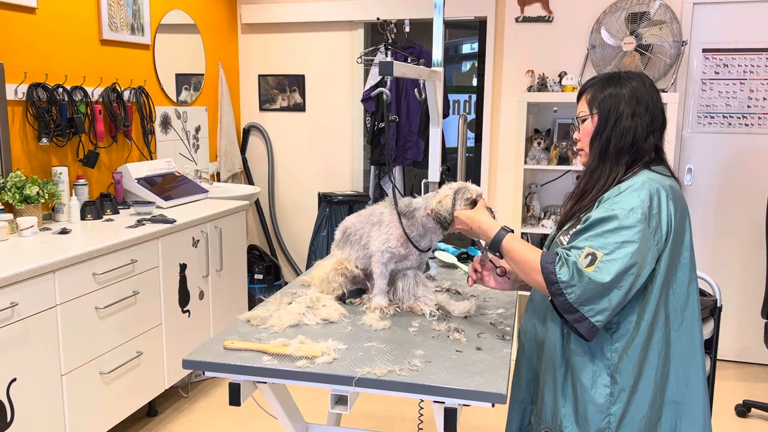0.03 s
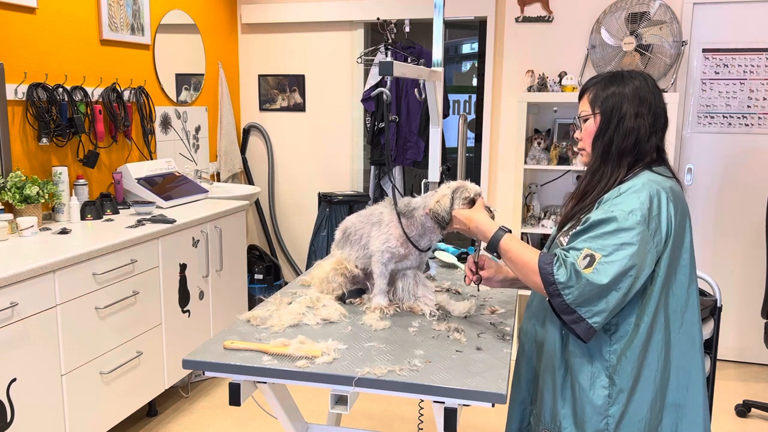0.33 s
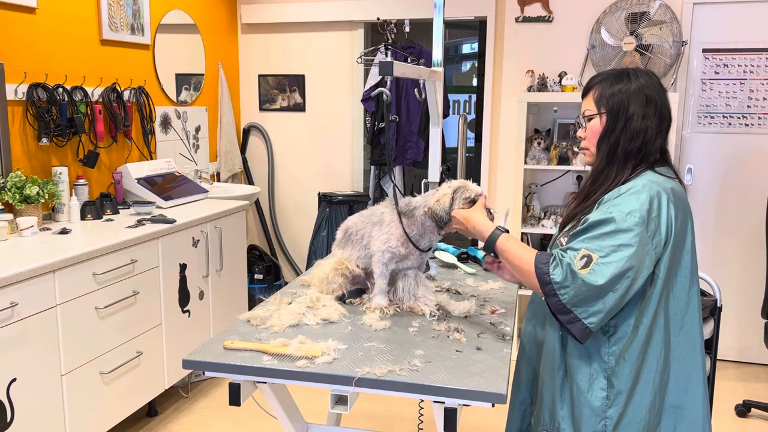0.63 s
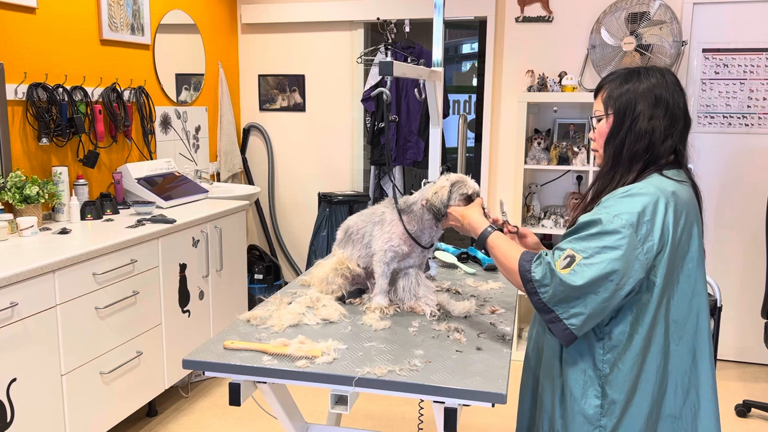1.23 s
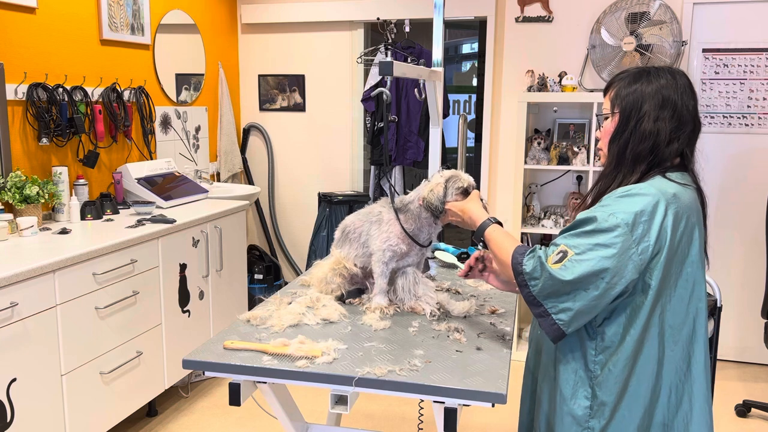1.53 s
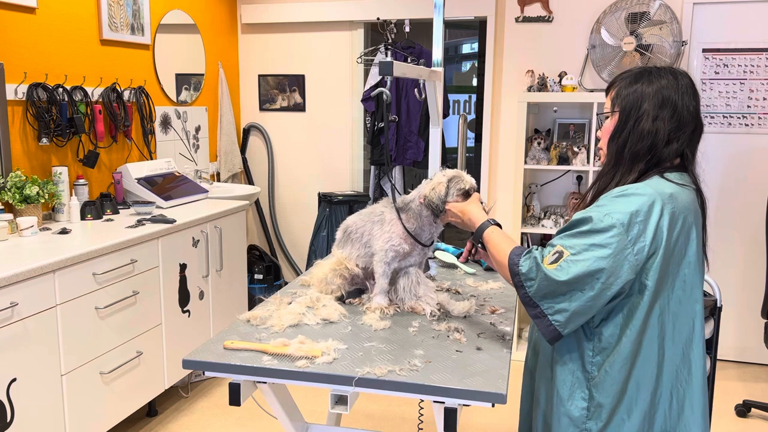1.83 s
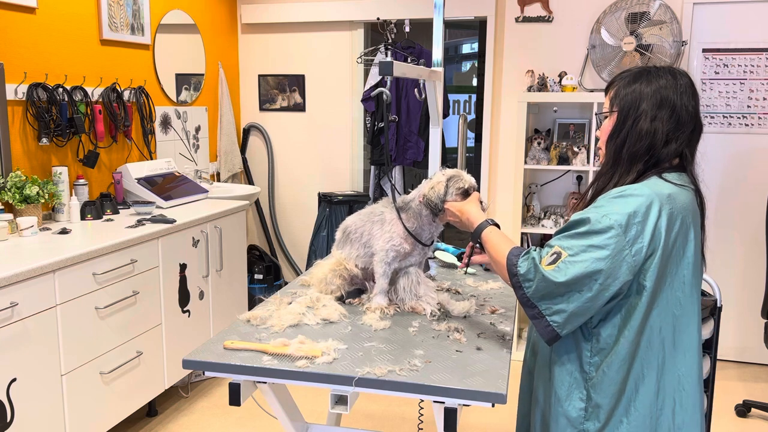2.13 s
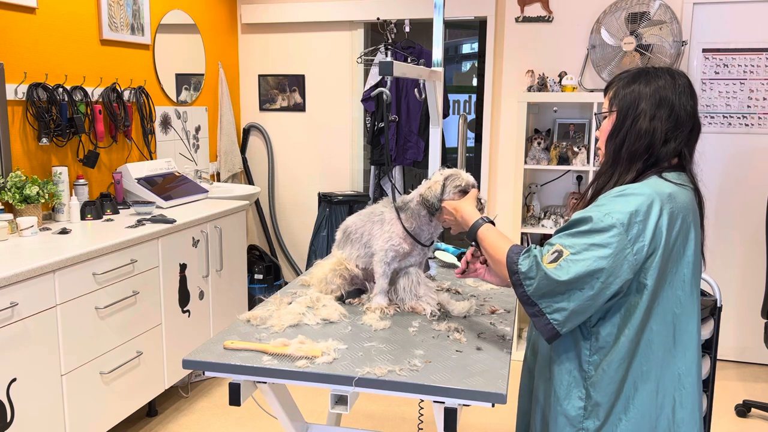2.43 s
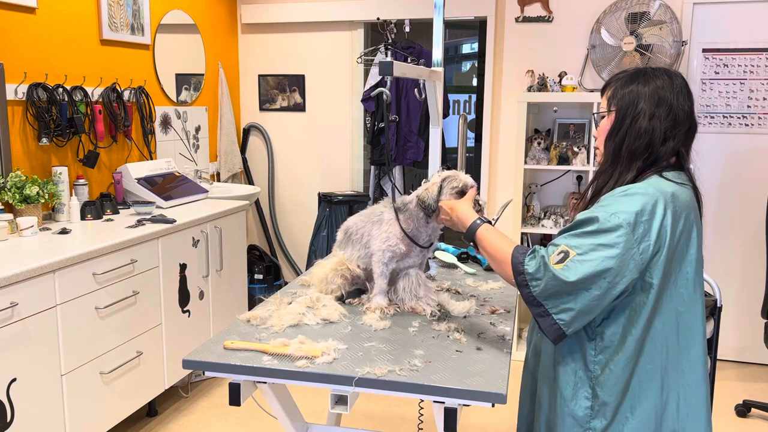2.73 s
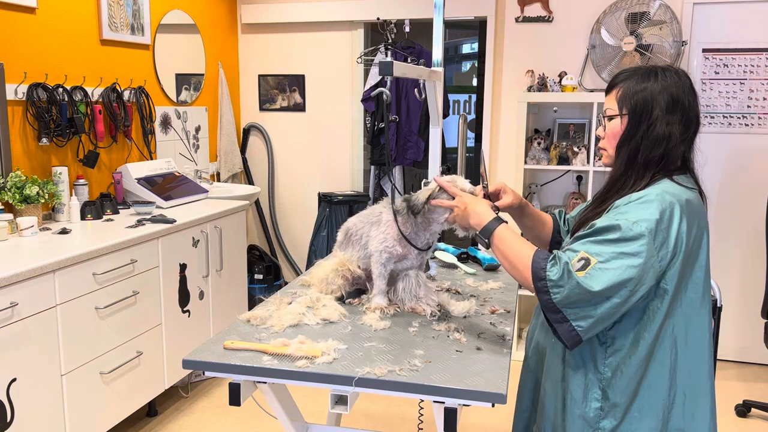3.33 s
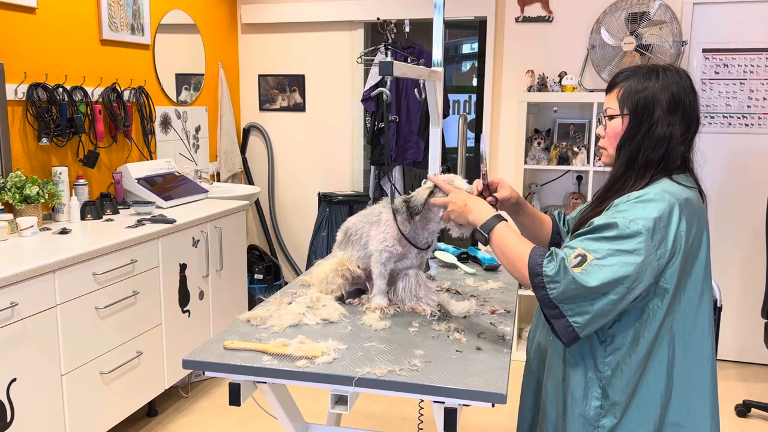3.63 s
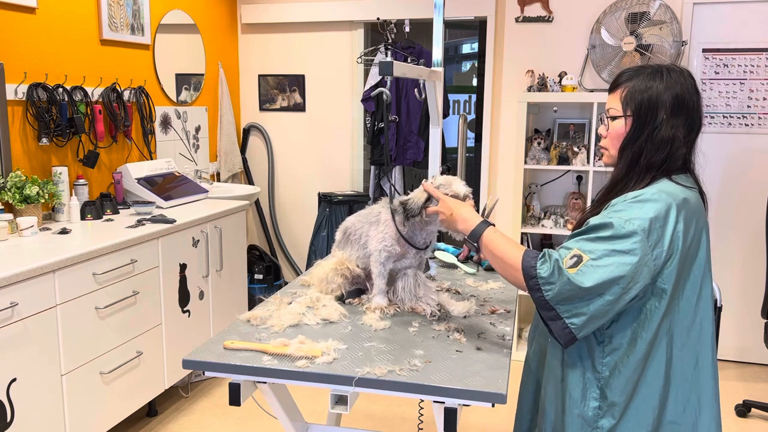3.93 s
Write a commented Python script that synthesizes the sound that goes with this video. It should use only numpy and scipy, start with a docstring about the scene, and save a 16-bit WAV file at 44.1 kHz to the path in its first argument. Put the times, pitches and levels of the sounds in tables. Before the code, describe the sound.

Grooming scissors trim a dog's fur in a small, hard-walled salon. The blades scrape and shut with one sharp, ringing clack, then give a few much softer snips and clicks. Ventilation rumbles and hisses softly throughout.

```python
"""Grooming scissors trim a dog's fur in a small, hard-walled salon.
The blades scrape along each other in short strokes. Once they shut hard, clack and ring;
three much softer clicks come later. A sleeve swishes as the arm moves.
All the while the ventilation hisses softly and keeps the room's low notes rumbling."""
import sys
import numpy as np
from scipy import signal
from scipy.fft import rfft, irfft
from scipy.io import wavfile
from scipy.ndimage import uniform_filter1d

SR = 44100
rng = np.random.default_rng(int(sys.argv[2]) if len(sys.argv) > 2 else 0)


def to_wav(s):
    """Save 16-bit WAV."""
    ch = np.atleast_2d(s).T  # columns
    pcm = np.round(np.clip(ch, -1, 1) * 32767)  # PCM
    wavfile.write(sys.argv[1], SR, pcm.astype(np.int16))


N = 176400
CRACK_S = .0009  # time a clack takes to reach its peak


def amp(db):
    """Turns decibels into a number to multiply by."""
    return 10 ** (np.asarray(db) / 20)


def unit(x):
    """Scales a signal to an average (rms) level of one."""
    return x / np.sqrt(np.mean(x ** 2) + 1e-30)


def read(points, hz):
    """Reads between the rows of a table, with pitch spaced in octaves."""
    f, value = np.transpose(points)
    return np.interp(np.log(hz + 1), np.log(f + 1), value)


def add(mix, start_s, sound):
    """Mixes a sound in at a given time."""
    part = mix[max(round(start_s * SR), 0):][:len(sound)]
    part += sound[:len(part)]


def colour(x, curve):
    """Turns each pitch up or down by a curve from Hz to dB."""
    return irfft(rfft(x) * amp(curve(np.fft.rfftfreq(x.shape[-1], 1 / SR))), x.shape[-1])


def lean(pair, balance):
    """Tips a stereo sound left or right, pitch by pitch."""
    return colour(pair, lambda f: np.outer([.5, -.5], read(balance, f)))


def bump(f, hz, width_hz):
    """A resonance: a peak of height one around a favoured pitch."""
    return 1 / (1 + (2 * (f - hz) / width_hz) ** 2)


def blade_stroke(length_s, level_db, swell_db, edge_hz, body_hz, tilt_db, sizzle_db):
    """Edge slips on edge in tiny jerks while hairs snap in clumps; edge and blade colour the noise."""
    # Tone of steel rubbing on steel: pitch_hz, level_db
    rub_tone = [(300, -11.5), (900, -8), (1900, -17.5), (2700, -7.5), (4200, -7.5), (6000, -4.5),
                (7100, -6.5), (7900, -3.5), (8700, 1), (9800, -9), (12300, -1.5), (14000, -23.5),
                (15500, -4)]
    slips_per_s, slip_spread_db, hiss_db = 3400, -1.5, 4.5
    crunch_hz, crunch_db = 173, 2.6
    edge_db, body_db = 12.5, 12
    rise_s, rub_fade_s, sizzle_fade_s = .45 * length_s, .01, .024
    t = np.arange(SR // 4) / SR
    slipping = rng.random(len(t)) < slips_per_s / SR
    slips = slipping * amp(slip_spread_db * np.minimum(rng.exponential(1, len(t)), 4))
    force = unit(slips * rng.choice([-1, 1], len(t))) + amp(hiss_db) * rng.standard_normal(len(t))
    clumps = colour(rng.standard_normal(len(t)), lambda f: 20 * np.log10(bump(f, crunch_hz, crunch_hz)))
    rub = colour(force * amp(crunch_db * unit(clumps)),
                 lambda f: read(rub_tone, f) + tilt_db * np.log2(f / edge_hz + .1)
                 + edge_db * bump(f, edge_hz, width_hz=1300) + body_db * bump(f, body_hz, width_hz=450))
    rub = unit(rub) * amp(level_db + swell_db * np.minimum(t / length_s, 1))
    # A thin, high ring outlasts the stroke.
    sizzle = colour(force, lambda f: 20 * np.log10(bump(f, hz=14400, width_hz=600)))
    sizzle = unit(sizzle) * amp(sizzle_db)
    rise = np.sin(np.pi / 2 * np.minimum(t / rise_s, 1)) ** 2
    after_s = np.maximum(t - length_s, 0)
    return rise * (rub * np.exp(-after_s / rub_fade_s) + sizzle * np.exp(-after_s / sizzle_fade_s))


def steel_note(hz, ring_s, spread):
    """A note that falls 60 dB in ring_s; it is rough because the two blades differ and touch."""
    t = np.arange(SR // 2) / SR
    pitches = hz * (1 + spread * rng.triangular(-1, 0, 1, size=12))
    tones = sum(np.sin(2 * np.pi * (f * t + rng.random())) for f in pitches) / np.sqrt(len(pitches))
    return tones * (1 - np.exp(-t / CRACK_S)) * np.exp(-np.log(1000) * t / ring_s)


def blade_ring(force):
    """A push on the blades sets all their notes ringing."""
    # Notes of the blades, cut short by the fingers: pitch_hz, level_db, ring_s
    blade_notes = [(2630, -3, 0.07), (4270, -7.5, 0.047), (5708, -1, 0.11), (6150, -6, 0.03),
                   (7990, 0.5, 0.06), (9130, -1, 0.046), (12100, 7.5, 0.049)]
    ringing = sum(amp(db) * steel_note(hz, ring_s, spread=.025) for hz, db, ring_s in blade_notes)
    return signal.fftconvolve(force, ringing / np.linalg.norm(ringing))[:N]


def vent_rumble():
    """Ventilation keeps the room's low notes going: wavering noise, almost alike in both ears."""
    # Low notes of the room: pitch_hz, width_hz, level_db
    room_notes = [(39.04, 4, -58), (49, 11, -62), (64.25, 7, -59), (119.1, 9.7, -54), (130.7, 14, -55),
                  (180.4, 8.4, -62.5), (224.86, 4.3, -68), (259.7, 9, -71)]
    side_db = -21.5  # the part that differs between the ears
    out = np.zeros((2, N))
    for hz, width_hz, db in room_notes:
        noise = rng.standard_normal((2, N))
        middle, side = colour(noise, lambda f: -10 * np.log10(1 + ((f - hz) / width_hz * 2) ** 4))
        out += amp(db) * (unit(middle) + amp(side_db) * np.outer([1, -1], unit(side)))
    return out


def vent_air():
    """Moving air makes a dull, slightly patchy noise."""
    # Tone of the air: pitch_hz, level_db
    air_tone = [(20, -37.5), (38, -5), (80, -1), (165, -3), (270, -1.5), (340, -13), (440, -22.5),
                (700, -29.5), (1500, -37.5), (1850, -32.5), (2350, -40.5), (4000, -45), (7000, -43),
                (10000, -52), (12500, -50), (16000, -95)]
    # How alike the two ears hear it: pitch_hz, likeness (1 = the same)
    ear_likeness = [(60, 0.99), (150, 0.76), (290, 0.56), (600, 0.12), (1400, .1), (15000, 0.092)]
    level_db, patch_db = -59.5, 1.8
    hz = np.fft.rfftfreq(2048, 1 / SR)
    noise = rng.standard_normal((5, N // 512 + 5, len(hz)))  # five grids of time by pitch
    left, separate = noise[0] + 1j * noise[1], noise[2] + 1j * noise[3]
    likeness = np.clip(read(ear_likeness, hz), -1, 1)
    right = likeness * left + np.sqrt(1 - likeness ** 2) * separate
    patches = unit(uniform_filter1d(uniform_filter1d(noise[4], size=10, axis=0), size=20, axis=1))
    grid = np.array([left, right]) * amp(read(air_tone, hz) + patch_db * patches)
    _, air = signal.istft(grid.transpose(0, 2, 1), nperseg=2048, noverlap=1536)
    return amp(level_db) * unit(air[:, :N])


def crack(strength_db):
    """Steel chatters on steel for a millisecond or two; harder blows are brighter."""
    # Tone of the blow: pitch_hz, level_db
    crack_tone = [(200, -32), (450, -12), (800, -21), (1700, -21), (3500, -20), (6500, -11.5), (7900, -5.5),
                  (11800, -15), (12700, -6), (16000, -5.5)]
    ping_db = 20 + .56 * strength_db  # the top note speaks only under a hard blow
    age = np.arange(SR // 20) / SR / CRACK_S
    burst = rng.standard_normal(len(age)) * age * np.exp(-age)
    burst = colour(burst, lambda f: read(crack_tone, f) + ping_db * bump(f, hz=14800, width_hz=710))
    burst = burst[:len(age) // 2]
    return amp(strength_db) * burst / np.linalg.norm(burst)


def scissors():
    """Scrapes and clacks ring the blades; each clack also leaves a note whose pitch depends on the grip."""
    # Blade strokes: start_s, length_s, level_db, swell_db, edge_hz, body_hz,
    # tilt_db (treble boost per octave), sizzle_db
    strokes = [(0.0, 0.0037, -44, -30.5, 11900, 5900, -6, -80), (0.148, 0.1, -70, 13, 15800, 7750, 4, -75),
               (0.206, 0.069, -52.5, -1.5, 11260, 2870, 5, -87),
               (0.28, 0.022, -45.5, -4.5, 14600, 8090, 3.5, -64),
               (1.432, 0.0082, -70.5, 0, 8000, 7780, -1, -95),
               (1.433, 0.045, -58, -12.5, 11600, 5540, 1, -84),
               (1.933, 0.11, -82.5, -1, 13300, 5400, -5, -99),
               (2.015, 0.025, -74, -5, 15300, 8500, -2.5, -95),
               (2.039, 0.022, -64.5, 3.5, 11330, 5900, 1, -82),
               (2.241, 0.021, -64.5, -3, 11900, 7670, 2, -82),
               (2.492, 0.009, -66, -1, 12200, 8000, 2.5, -82),
               (2.504, 0.023, -54.5, -18.5, 12050, 6320, 3, -82),
               (3.808, 0.052, -73, -4.5, 11840, 7700, -1.5, -94)]
    # The blades catch or meet their stop: start_s, strength_db, note_hz, note_db
    hits = [(0.3063, -11.5, 2682, -47.5), (2.0615, -35.5, 2670, -62.5), (2.256, -56, 3451, -63.5),
            (2.521, -49.5, 2710, -64)]
    scrape_ring_db, clack_ring_db = -26.5, -9
    scrapes, clacks, blows = np.zeros((3, N))
    for start_s, *stroke in strokes:
        add(scrapes, start_s, blade_stroke(*stroke))
    for start_s, strength_db, note_hz, note_db in hits:
        add(clacks, start_s, crack(strength_db))
        add(clacks, start_s + CRACK_S, amp(note_db) * steel_note(note_hz, ring_s=.029, spread=.06))
        add(blows, start_s + CRACK_S, amp([strength_db]))
    return scrapes + clacks + blade_ring(amp(scrape_ring_db) * scrapes + amp(clack_ring_db) * blows)


def sleeve():
    """Cloth slides on cloth in soft swells of noise."""
    # Swishes of the sleeve: middle_s, length_s, level_db, pitch_hz
    swishes = [(0.945, 0.2, -86.5, 1430), (1.328, 0.51, -86, 1920), (1.477, 0.12, -76.5, 516),
               (1.92, 0.28, -88.5, 1720)]
    half_width_octaves = .21
    t, out = np.arange(N) / SR, np.zeros(N)
    for middle_s, length_s, db, hz in swishes:
        cloth = colour(rng.standard_normal(N),
                       lambda f: -10 * np.log10(1 + (np.log2((f + 1) / hz) / half_width_octaves) ** 4))
        swell = np.cos(np.pi * np.clip((t - middle_s) / length_s, -.5, .5))
        out += amp(db) * unit(cloth) * swell
    return out


def salon(sound):
    """Sound arrives directly, then off table and walls, then as an echo tail whose treble dies first."""
    # Time the tail takes to fall 60 dB: pitch_hz, ring_s
    ring_times = [(300, 0.62), (2500, .5), (6000, 0.46), (8500, 0.4), (12000, 0.32), (16000, 0.33)]
    # Tone of the straight path to the listener: pitch_hz, level_db
    direct_tone = [(500, -3), (3000, -0.5), (7000, 1), (11000, -9.5), (14500, 3.5)]
    # Tone of the sound sent into the room: pitch_hz, level_db
    echo_tone = [(6000, 0.5), (12000, 0), (15000, -11)]
    tail_db, early_db, early_per_s = 4, -6.5, 1500
    first_echo_s, early_fade_s, left_lag_s = .002, .0044, .000047
    t = np.arange(SR) / SR
    hz, when_s, grid = signal.stft(rng.standard_normal((2, SR)), SR, nperseg=256)
    dying = np.exp(-np.log(1000) * when_s / read(ring_times, hz)[:, None])
    tail = signal.istft(grid * dying, SR)[1][:, :SR] * (t > first_echo_s)
    bounces = rng.choice([-1, 1], (2, SR)) * (rng.random((2, SR)) < early_per_s / SR)
    early = bounces * np.exp(-t / early_fade_s) * (t > first_echo_s)
    echoes = (amp(tail_db) * unit(tail) + amp(early_db) * unit(early)) / np.sqrt(SR)
    right = colour(sound, lambda f: read(direct_tone, f))
    delay = np.exp(-2j * np.pi * np.fft.rfftfreq(N, 1 / SR) * left_lag_s)
    left = irfft(rfft(right) * delay, N)
    into_room = colour(sound, lambda f: read(echo_tone, f))
    return np.array([left, right]) + signal.fftconvolve(into_room[None], echoes, axes=1)[:, :N]


def scene():
    """Scissors and sleeve sound in the room, over the ventilation."""
    # Where scissors and sleeve sit between the ears: pitch_hz, left_minus_right_db
    grooming_balance = [(500, 3.5), (1700, 1), (4500, -4.5), (8000, -3), (15000, 0.5)]
    # Where the ventilation sits: pitch_hz, left_minus_right_db
    vent_balance = [(60, 2.5), (130, 0), (260, 4.5), (500, -1), (4000, -3.5)]
    grooming = lean(salon(scissors() + sleeve()), grooming_balance) * amp(-2.0)
    return grooming + lean(vent_rumble() + vent_air(), vent_balance)


def record(dry):
    """Fades both ends and cuts the very highest treble."""
    fade_s, cut_hz = .006, 15850
    t = np.arange(N) / SR
    faded = dry * np.minimum(np.minimum(t, t[::-1]) / fade_s, 1)
    treble_cut = signal.firwin(511, cut_hz, window=("kaiser", 9), fs=SR)
    return signal.oaconvolve(faded, treble_cut[None], "same")


dry = scene()
out = record(dry)
to_wav(out)
```